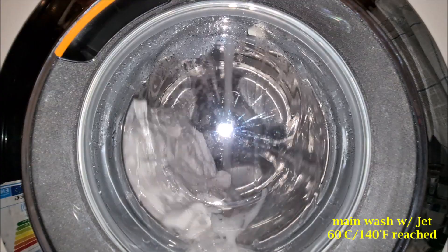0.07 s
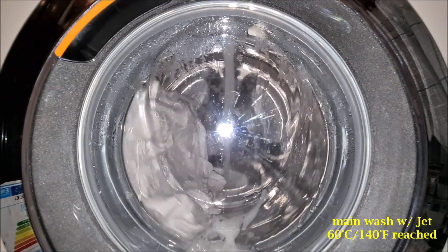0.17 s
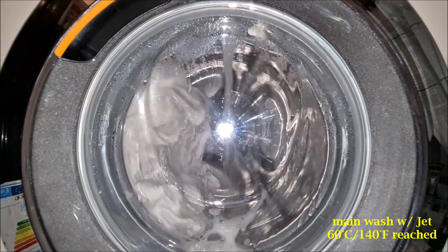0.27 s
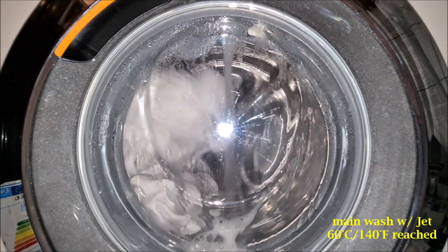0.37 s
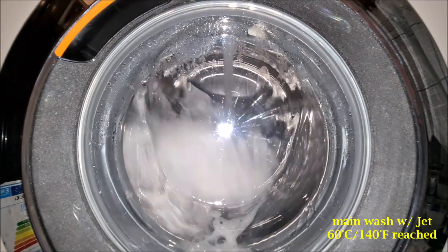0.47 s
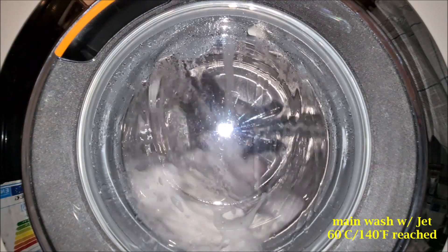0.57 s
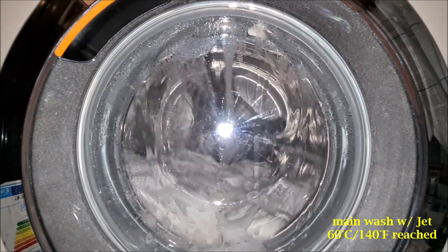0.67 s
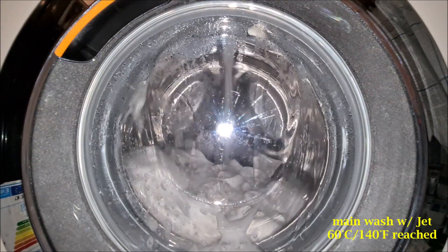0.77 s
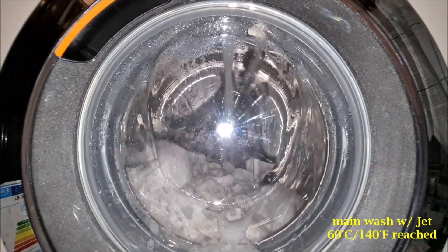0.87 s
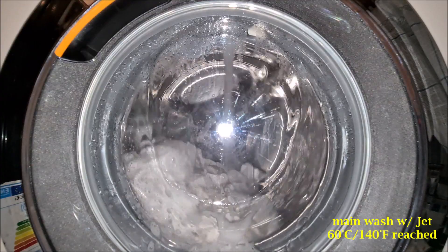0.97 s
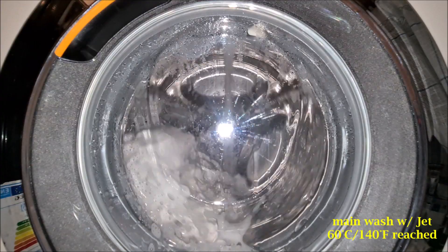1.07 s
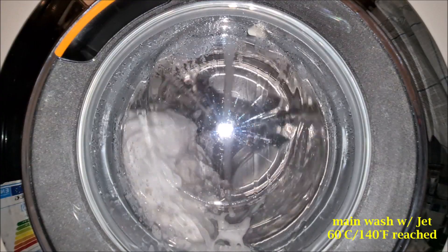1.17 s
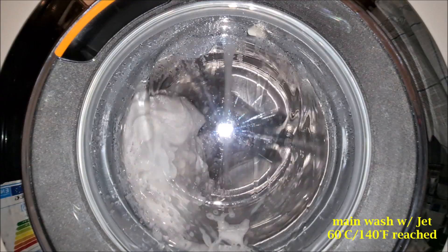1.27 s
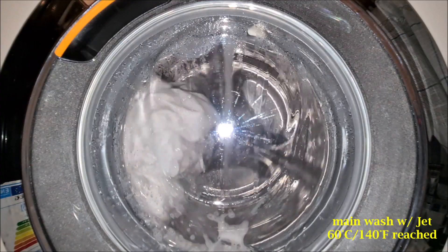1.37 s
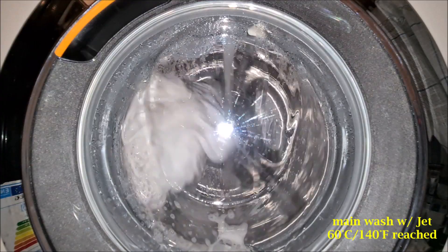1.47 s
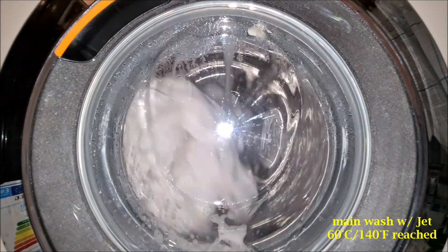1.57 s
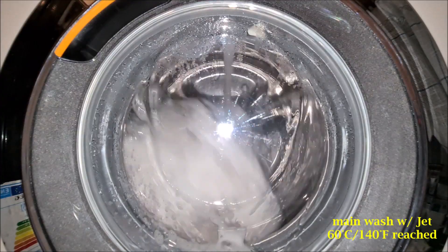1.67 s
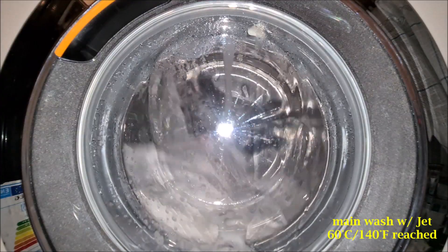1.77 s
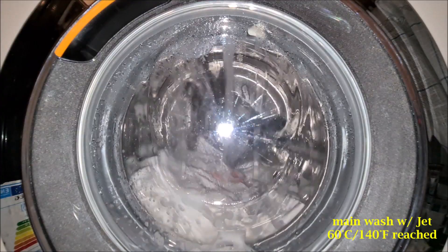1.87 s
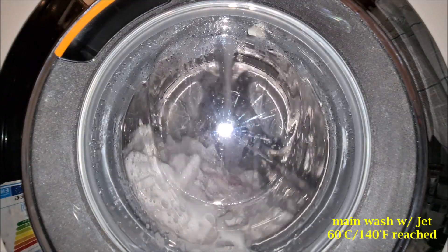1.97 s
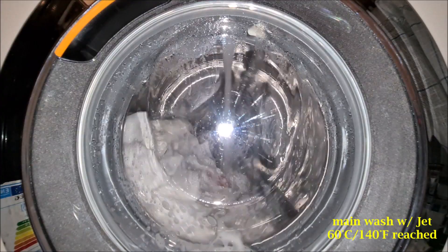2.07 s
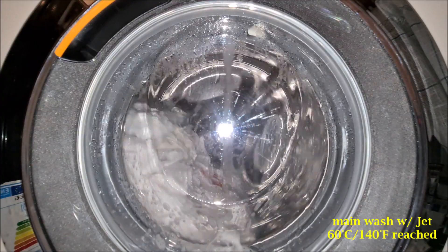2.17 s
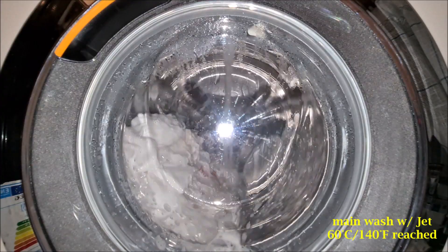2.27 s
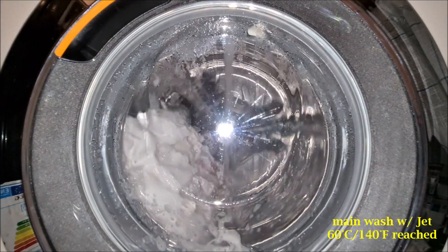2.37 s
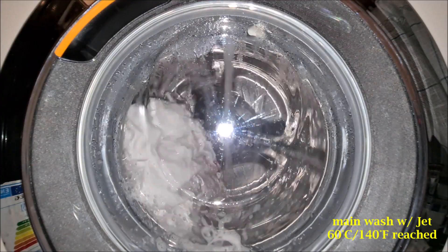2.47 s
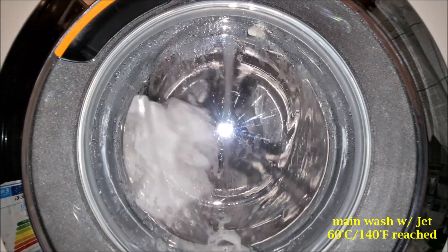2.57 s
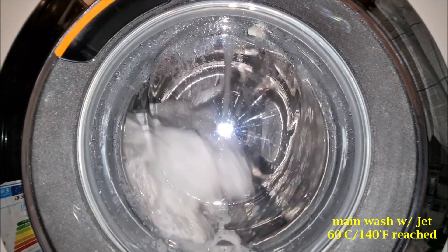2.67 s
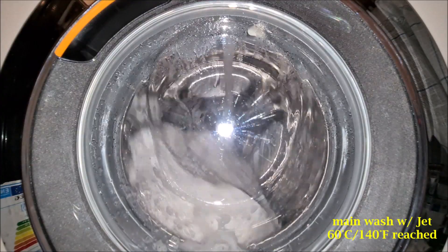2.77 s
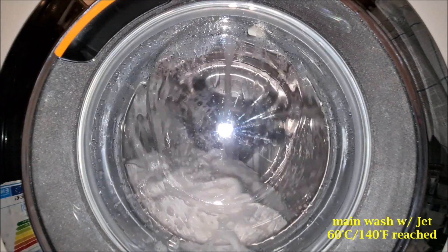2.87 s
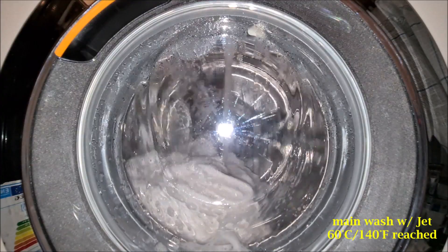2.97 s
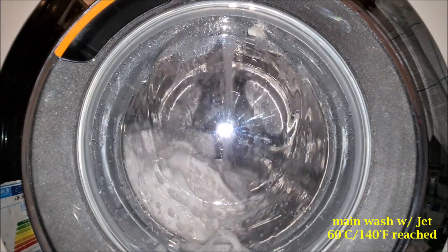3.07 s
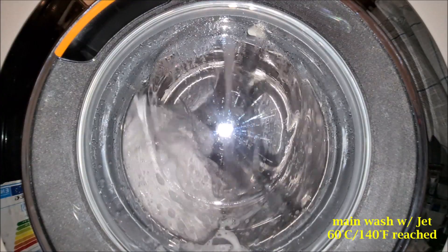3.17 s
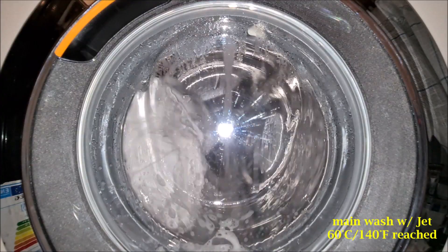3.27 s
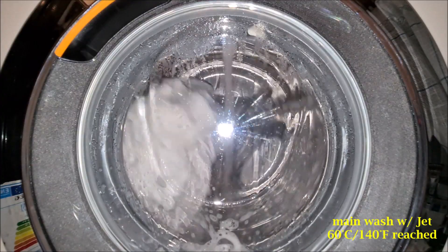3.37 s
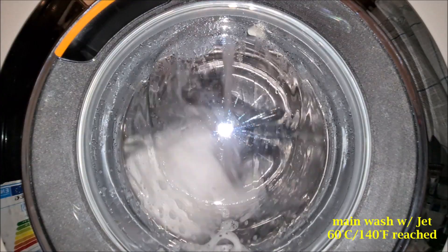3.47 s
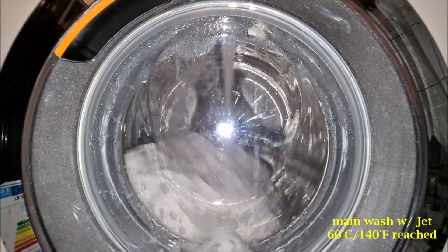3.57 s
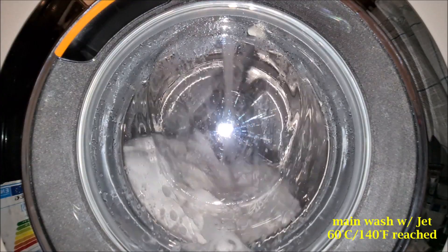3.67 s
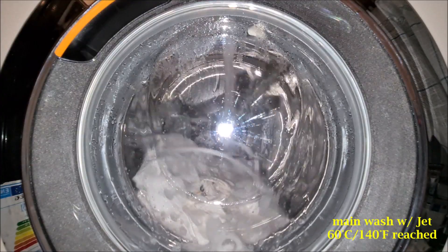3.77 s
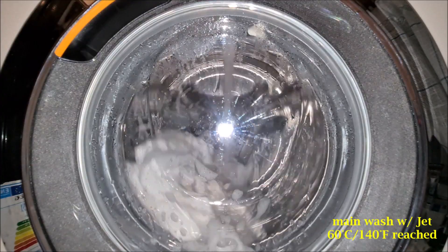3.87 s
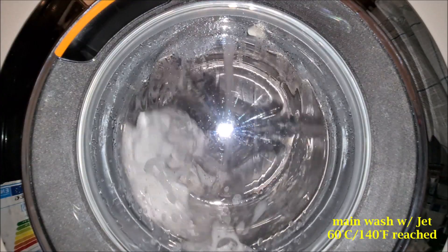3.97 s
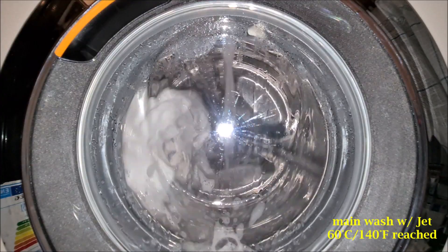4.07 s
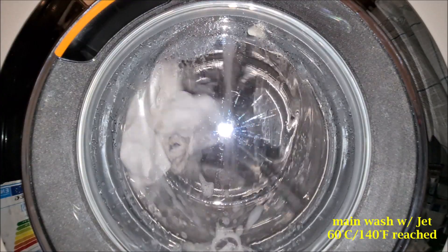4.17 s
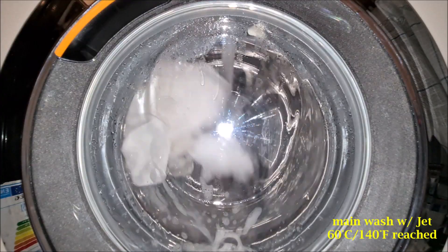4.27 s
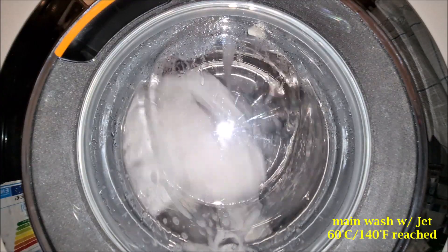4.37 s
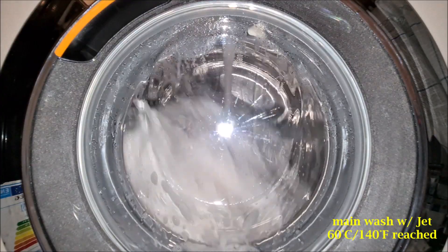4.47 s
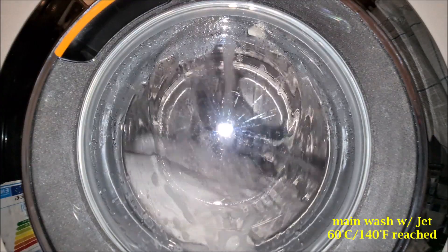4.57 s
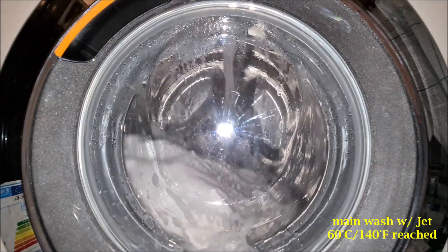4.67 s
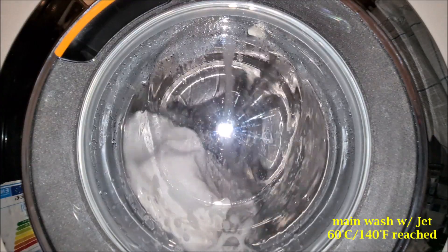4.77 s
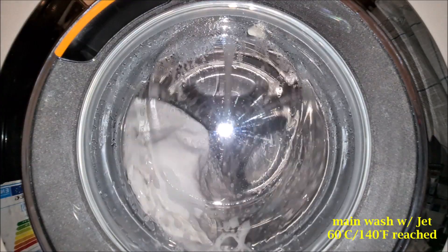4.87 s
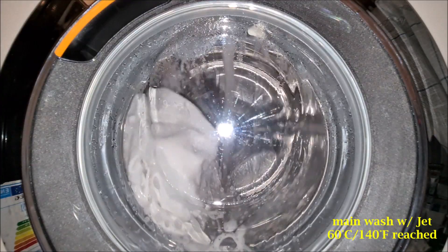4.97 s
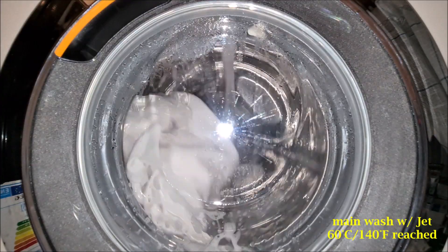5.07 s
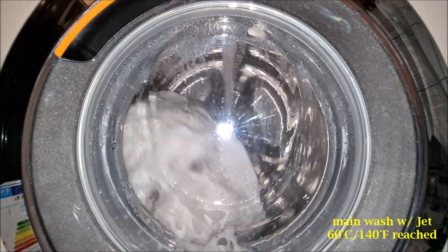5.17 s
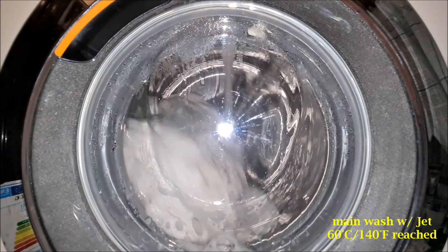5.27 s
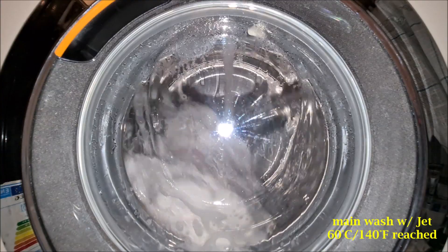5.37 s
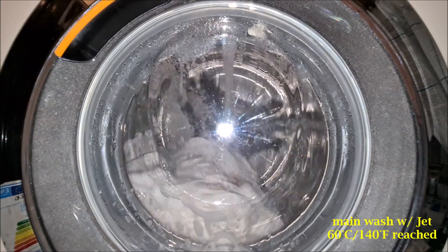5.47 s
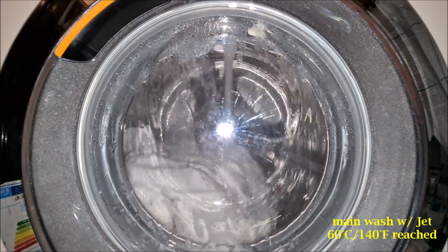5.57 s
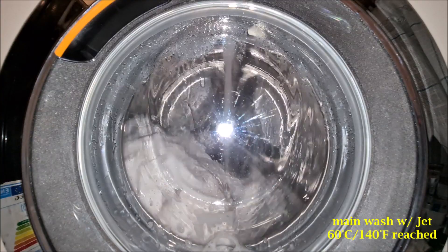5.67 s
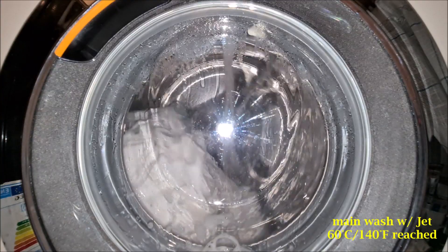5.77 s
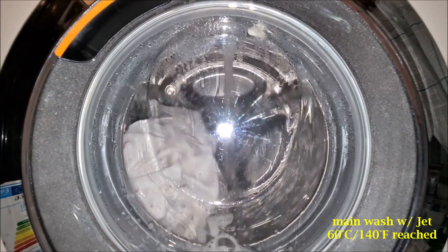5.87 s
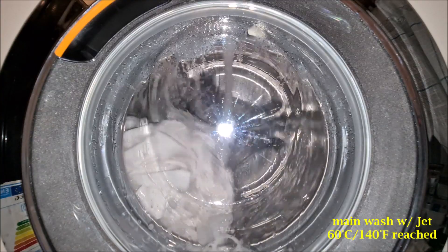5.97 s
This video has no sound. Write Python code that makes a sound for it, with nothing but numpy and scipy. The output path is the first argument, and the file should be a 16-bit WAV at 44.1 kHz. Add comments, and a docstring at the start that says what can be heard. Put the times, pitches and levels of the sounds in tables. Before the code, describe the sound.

Heard close outside the door glass of a running front-loading washer, for about six seconds. A low, slightly wavering pump and motor hum continues under soft drum rumble, muffled watery churning, faint hiss and fine pattering drops. Three quick hollow hoots of cloth rubbing the door come at 0.1-0.3, then a heavy wet flop with a deep boom at 0.6 while spray hiss rises until about 1.3. A bright double tick cracks at 1.0. Another hoot at 1.5 leads to clustered wet slaps and the strongest low thump near 1.8. Jet hiss swells again from 2.5 to 3.2, brightest and faintly singing near 2.7, around a softer, splashier flop at 2.8. Rumbling flops follow at 3.7, 4.5 with extra slaps, and 5.4, with small hoots near 3.2, 4.2 and faintly 5.7-5.9. Humming, churning and patter carry on to the end.

```python
"""Just outside the door glass of a front-loading washing machine: wet laundry tumbles about once a second.
Pump and motor hum as sine lines; the drum rumbles and churns as coloured noise.
Rising cloth rubs the door (resonant noise, wavering hoots), then flops (clouds of impacts); the tub booms.
Drops patter as random impacts smeared by the drum, a jet hisses in bursts on bare steel,
and a few short noise cracks tick against the drum, most clearly near 1 s."""
import sys
import numpy as np
from scipy import signal
from scipy.fft import rfft, irfft
from scipy.io import wavfile
from scipy.ndimage import uniform_filter1d

SR = 44100
rng = np.random.default_rng(int(sys.argv[2]) if len(sys.argv) > 2 else 0)


def transcribe(u):
    """Save the signal u as a 16-bit wav file named by the first command-line argument.

    u: samples, shape (n,) or (channels, n), limited to [-1, 1]; the rate is SR.
    q: integer samples, one column per channel.
    """
    v = np.clip(np.atleast_2d(u).T, -1, 1)
    q = np.round(v * 32767).astype(np.int16)
    wavfile.write(sys.argv[1], SR, q)


N = 266055
TIME_S = np.arange(N) / SR
BINS_HZ = np.fft.rfftfreq(N, 1 / SR)

# Levels are nominal, ahead of the microphones. Spectra set colour only: radiate() normalises them.
# Pump lines on mains multiples, motor at 130 Hz: (frequency [Hz], rms level [dB])
HUM_LINES = [(50, -54.5), (100, -54.5), (130, -61.5), (200, -55), (250, -59), (300, -63), (500, -77.5),
             (550, -83)]
# Rumble of the tub on its springs: (frequency [Hz], relative density [dB per Hz])
RUMBLE_SPECTRUM = [(22, -48), (31, -31), (42, -15), (54, -1), (76, 6.5), (92, -1), (120, -29), (200, -45),
                   (500, -41.5)]
# Load churning in water: (frequency [Hz], relative density [dB per Hz])
CHURN_SPECTRUM = [(60, -10.5), (110, -2.5), (140, 1.5), (165, 3), (183, -7), (212, 2), (245, 1),
                  (283, -3.5), (315, 1), (345, -3.5), (450, -2), (535, -12.5), (680, -14), (1300, -28.5)]
# Bunched load rolling over: (start [s], length [s], rumble level [dB], churning level [dB])
ROLLS = [(1.414, 0.11, -55, -49), (1.994, 1, -50, -50), (3.363, 0.75, -59, -51), (3.553, 0.43, -36, -49),
         (4.978, .8, -52, -50)]
# Load carried up and dropped: (landing [s], level [dB], gathering time [s], splash re level [dB],
# tub boom peak [dB], rub level on the way up [dB], lead of rub on landing [s])
TUMBLES = [(0.586, -33, 0.031, -13, -28, -46, .33), (1.799, -37.5, 0.1, -14.5, -31.5, -47.5, 0.35),
           (2.812, -39, 0.024, -7.5, -46, -44.5, 0.11), (3.659, -36.5, 0.041, -14, -40, -57.5, 0.092),
           (4.522, -34, 0.032, -13.5, -28.5, -44.5, 0.28), (5.392, -37, 0.069, -16.5, -32, -53.5, 0.19)]
# Cloth catching on the door, which hoots: (time [s], peak level [dB])
CATCHES = [(0.116, -35.5), (0.217, -37), (0.312, -37.5), (1.36, -41.5), (1.534, -34.5), (2.535, -39),
           (2.689, -41), (3.228, -41), (4.12, -48), (4.199, -41.5), (5.68, -45), (5.88, -47.5)]
# Water drops and runoff: (frequency [Hz], relative density [dB per Hz])
WATER_SPECTRUM = [(300, -19.5), (700, -0.5), (1000, 0.5), (1500, -3), (2000, -10), (3100, -16), (4400, -17),
                  (6200, -20.5), (9000, -41.5), (15000, -31.5)]
# Bare steel uncovered to the jet: (start [s], length [s], force [dB], ahead of the spray gain)
JET_BURSTS = [(0.576, 0.72, -76), (2.507, 0.66, -68.5), (2.698, 0.1, -62.5)]
# Fine spray: (frequency [Hz], relative density [dB per Hz])
SPRAY_SPECTRUM = [(400, -5), (1000, 7), (1400, -2), (2400, -2), (3500, -0.5), (4600, -4), (6200, -4),
                  (9000, -11), (15500, -17)]
# Pitches the steel sings under the full jet: (frequency [Hz], width [Hz], relative level [dB])
STEEL_PITCHES = [(3250, 250, 3.5), (4200, 220, -9), (6100, 600, -10.5)]
# Faint background hiss: (frequency [Hz], relative density [dB per Hz])
AIR_SPECTRUM = [(100, -42), (2000, 25.5), (6000, 2.5), (9000, -1), (15500, -7.5)]
# Heavy lumps bumping the tub: (time [s], peak level [dB], pitch [Hz])
THUMPS = [(0.208, -37, 59.3), (1.017, -38.5, 56), (1.773, -19.5, 65.2), (2.236, -32, 60.3), (2.31, -35, 60),
          (2.392, -33.5, 63.6), (2.886, -36.5, 65), (2.936, -36.5, 60.6), (3.336, -32, 65),
          (3.535, -40, 67), (3.872, -36, 55.6), (4.803, -36, 64), (5.472, -30.5, 76)]
# Single wet folds smacking flat: (time [s], level [dB], splash re level [dB])
SLAPS = [(1.012, -53, -6), (1.705, -35.5, -14.5), (1.756, -34, -7.5), (1.79, -38.5, -10.5),
         (1.835, -37, -17), (2.371, -48, -12), (3.09, -52.5, -2.5), (4.446, -39.5, -15), (4.553, -42.5, -4),
         (4.589, -32, -17.5), (5.09, -46.5, -8.5)]
# Dull slap of cloth: (frequency [Hz], relative density [dB per Hz])
FLOP_SPECTRUM = [(50, -7.5), (110, -1), (160, -3), (185, -5.5), (215, 3), (250, 1), (282, -5.5), (330, -4),
                 (460, -1.5), (550, -12.5), (850, -25.5), (2000, -52)]
# Wet smack: (frequency [Hz], relative density [dB per Hz])
SPLASH_SPECTRUM = [(300, -29), (500, -8), (700, 4.5), (880, -2.5), (1200, -4.5), (1700, -15), (2800, -20.5),
                   (4000, -29), (6500, -38.5), (15000, -71)]
# Hard ticks and fat drops on the drum: (time [s], level ahead of crack and ring gains [dB],
# crack dying time [s])
TICKS = [(0.996, -61, 0.0015), (1.003, -52.5, 0.0031), (1.759, -73, 0.0053), (3.607, -74, .003),
         (4.514, -71, .004), (4.833, -69, 0.0036), (4.954, -72, .002)]
# Hard contact: (frequency [Hz], relative density [dB per Hz])
TICK_SPECTRUM = [(600, -28), (1500, -16), (2500, 3), (3600, 2.5), (4150, 1.5), (4700, 4.5), (5200, -5),
                 (5600, -0.5), (7000, -4.5), (9500, -8.5), (15500, -16)]
# Resonances of tub and drum, applied to all noise layers: (frequency [Hz], width [Hz], relative lift [dB])
SHELL_RESONANCES = [(376.1, 5, 5.5), (602, 66, 5.5), (828, 57, 3), (997, 175, 3.5), (1458, 36, 6.5),
                    (1606, 30, 2.5), (1747, 50, 5), (2210, 44, 5.5), (2373, 76, 5), (2715, 30, 7),
                    (3250, 170, -1), (4000, 110, 0.5), (4940, 95, 5.5)]
# Stereo likeness, clipped to +-1 in use: (frequency [Hz], left-right correlation [1])
CORRELATION = [(60, 0.8), (180, 1.6), (280, 0.8), (400, 0.7), (550, 0.36), (1000, 0.01), (4000, 0),
               (12000, 0.1)]
# Stereo balance: (frequency [Hz], left minus right [dB])
LEFT_MINUS_RIGHT = [(60, -3.5), (150, -2), (300, -2), (500, -1), (2000, 0.7), (4500, -2.5), (8000, -0.7),
                    (15000, 0.5)]
# Microphone colour: (frequency [Hz], gain [dB])
MICROPHONE = [(6400, -1), (6900, -5), (7400, -9), (7850, -6), (8100, -2), (8600, 0.5)]

RUMBLE_DB, CHURN_DB, PATTER_DB = -53.5, -51, -66.5
LULL_DELAY_S, LULL_WIDTH_S, LULL_DB = 0.27, 0.036, -3.5
ROLL_EDGE_S = 0.063
JOLT_RE_BOOM_DB, JOLT_RISE_S, JOLT_DIE_S = -12, 0.058, 0.1
RUB_HZ, RUB_WIDTH_HZ = 395.7, 68
RUB_RISE_S, RUB_DIE_S, RUB_BASE_DB = 0.14, 0.11, -55
CATCH_S = 0.017
PUMP_PULSE_SHARE = 0.24
JET_RISE_S, JET_DIE_S = 0.062, 0.14
JET_BASE_DB, JET_FADE_DB_PER_S = -73, 0.26
TUB_HZ, BOOM_DIE_S = 65, 0.063
THUMP_RISE_S, THUMP_DIE_S = 0.013, 0.02
FLOP_HOLD_S, FLOP_DIE_S = 0.028, 0.034
SLAP_RISE_S, SLAP_DIE_S = 0.001, 0.032
SMACK_T60_S = 0.04
TICK_RING_S = 0.025
EDGE_HZ = 15730


def from_db(db):
    """Decibels to gain."""
    return 10 ** (np.asarray(db) / 20)


def unit(x):
    """Scales to rms 1."""
    return x / np.sqrt(np.mean(x ** 2) + 1e-20)


def at_bins(points):
    """Joins (frequency [Hz], value) points on a log-frequency axis."""
    hz, value = np.transpose(points)
    return np.interp(np.log(BINS_HZ + 1), np.log(hz + 1), value)


def muffled(spectrum, corner_hz):
    """Water and cloth swallow the treble above a corner."""
    return at_bins(spectrum) - 20 * np.log10(1 + (BINS_HZ / corner_hz) ** 2)


def wander(rate_hz):
    """Slow random drift of rms 1: noise under a Gaussian low-pass."""
    spectrum = rfft(rng.standard_normal(N))
    return unit(irfft(spectrum * np.exp(-(BINS_HZ / rate_hz) ** 2), N))


def noise():
    """Two unrelated white noises."""
    return rng.standard_normal((2, N))


def impacts(per_s, spread_db):
    """Random tiny blows of uneven size, reaching both sides with unrelated strength."""
    size = from_db(spread_db * np.minimum(rng.exponential(1, N), 4))
    struck = rng.random(N) < per_s / SR
    return unit(noise() * size * struck)


def held(start_s, length_s, rise_s, die_s):
    """Builds up to the start, holds for the length, then dies away."""
    t = TIME_S - start_s
    rise = (np.minimum(t, 0) / rise_s) ** 2
    fall = np.maximum(t - length_s, 0) / die_s
    return np.exp(-rise - fall)


def swell(peak_s, gather_s, die_s):
    """Builds up to one moment, then dies away."""
    return held(peak_s, 0, gather_s, die_s)


def together(gains):
    """Unrelated sounds add in power."""
    return np.sqrt(sum(gain ** 2 for gain in gains))


def radiate(drive, spectrum_db):
    """Colours a white pair and lets it out through the shell, mixing the sides by correlation."""
    a, b = rfft(drive)
    same = np.clip(at_bins(CORRELATION), -1, 1)
    mid = a * np.sqrt((1 + same) / 2)
    side = b * np.sqrt((1 - same) / 2)
    shell_db = sum(db / (1 + (2 * (BINS_HZ - hz) / width_hz) ** 2)
                   for hz, width_hz, db in SHELL_RESONANCES)
    colour = unit(from_db(spectrum_db + shell_db))
    return irfft(np.array([mid + side, mid - side]) * colour, N)


def in_drum(drive, t60_s):
    """The drum smears each blow into a short random ring, with unevenness across pitch reduced."""
    t = TIME_S[:SR // 4]
    scatter = rfft(noise()[:, :len(t)] * from_db(-60 * t / t60_s))
    softened = scatter / np.sqrt(abs(scatter) + 1e-12)  # keeps the root of the magnitude
    tail = irfft(softened)[:, :len(t) // 2]
    tail /= np.linalg.norm(tail, axis=1, keepdims=True)
    return signal.fftconvolve(drive, tail, axes=1)[:, :N]


def patchy(drive, patchy_db):
    """Random uneven patches of level across pitch and time, a few hundredths of a second long."""
    z = signal.stft(drive, nperseg=256)[2]
    patches = uniform_filter1d(rng.standard_normal(z.shape[1:]), size=4, axis=0)  # across pitch
    patches = uniform_filter1d(patches, size=7, axis=1)  # across time
    return unit(signal.istft(z * from_db(patchy_db * unit(patches)))[1][:, :N])


def hum(waver_db=1.43, sway_rad=0.31):
    """Lines of pump and motor; the shifting load makes each waver in strength and timing."""
    total = 0
    for hz, db in HUM_LINES:
        amplitude = np.sqrt(2) * from_db(db + waver_db * wander(2.7))
        phase_rad = 2 * np.pi * (hz * TIME_S + rng.random()) + sway_rad * wander(1.6)
        total = total + amplitude * np.sin(phase_rad)
    return total


def drum(lumpy_db=2.1, heave_db=-1.0):
    """The tub rumbles on its springs as the load churns: more in rolls; steady churning lulls after falls."""
    rolls = [(held(s, length_s, ROLL_EDGE_S, ROLL_EDGE_S), rumble_db, churn_db)
             for s, length_s, rumble_db, churn_db in ROLLS]
    # each boom also sets the cabinet rumbling
    jolts = [from_db(boom_db + JOLT_RE_BOOM_DB) * swell(s, JOLT_RISE_S, JOLT_DIE_S)
             for s, _, _, _, boom_db, *_ in TUMBLES]
    steady_shake = from_db(RUMBLE_DB + heave_db * wander(4.4))
    shake = together([steady_shake] + jolts + [from_db(db) * roll for roll, db, _ in rolls])
    # the fallen load lies still for a moment
    lull = sum(np.exp(-((TIME_S - s - LULL_DELAY_S) / LULL_WIDTH_S) ** 2) for s, *_ in TUMBLES)
    steady_stir = from_db(CHURN_DB + LULL_DB * lull)
    stir = together([steady_stir] + [from_db(db) * roll for roll, _, db in rolls])
    rumble = shake * radiate(noise(), muffled(RUMBLE_SPECTRUM, corner_hz=704))
    lumps = unit(from_db(lumpy_db * wander(5.5)))
    churn = stir * lumps * radiate(noise(), muffled(CHURN_SPECTRUM, corner_hz=1710))
    return rumble + churn


def rubbing(waver_share=0.0428):
    """Rising wet cloth slides on the door and stirs a hollow resonance, which hoots when it catches."""
    resonance_db = -20 * np.log10(1 + ((BINS_HZ - RUB_HZ) / RUB_WIDTH_HZ) ** 2)
    lifts = [from_db(rub_db) * swell(s - lead_s, RUB_RISE_S, RUB_DIE_S)
             for s, *_, rub_db, lead_s in TUMBLES]
    slide = together([from_db(RUB_BASE_DB)] + lifts) * radiate(noise(), resonance_db)
    grip = sum(from_db(db) * swell(s, CATCH_S, CATCH_S) for s, db in CATCHES)
    turns = np.cumsum(RUB_HZ * (1 + waver_share * wander(41.3))) / SR
    return slide + grip * np.sin(2 * np.pi * turns)


def jet_force():
    """How hard the jet strikes bare steel: a slowly weakening base plus bursts."""
    bursts = [from_db(db) * held(s, length_s, JET_RISE_S, JET_DIE_S) for s, length_s, db in JET_BURSTS]
    return together([from_db(JET_BASE_DB - JET_FADE_DB_PER_S * TIME_S)] + bursts)


def water(drop_share=0.66, surge_db=-0.5, runoff_db=1, runoff_delay_s=0.11):
    """Drops patter, pulsing with each turn of the pump; jet water runs off a moment after it strikes."""
    pump_hz = HUM_LINES[0][0]
    pulse = 1 + PUMP_PULSE_SHARE * (2 * np.cos(np.pi * pump_hz * TIME_S) ** 4 - 1)
    drops = patchy(in_drum(pulse * impacts(per_s=700, spread_db=0.5), t60_s=0.087), patchy_db=-0.5)
    stream = unit(pulse * noise())
    flow = np.sqrt(drop_share) * drops + np.sqrt(1 - drop_share) * stream
    flow = flow * from_db(surge_db * wander(14.0))
    runoff = from_db(runoff_db) * np.interp(TIME_S - runoff_delay_s, TIME_S, jet_force())
    return together([from_db(PATTER_DB), runoff]) * radiate(flow, at_bins(WATER_SPECTRUM))


def jet(spray_gain_db=4.0, flutter_db=-0.6, sing_db=-64):
    """A fine spray hisses on steel left bare by the laundry; head-on it makes the steel sing."""
    spray = patchy(impacts(per_s=20000, spread_db=-0.5), patchy_db=1.5)
    spray = spray * from_db(flutter_db * wander(25))
    force = jet_force()
    hiss = from_db(spray_gain_db) * force * radiate(spray, at_bins(SPRAY_SPECTRUM))
    steel = sum(from_db(db) / (1 + ((BINS_HZ - hz) / width_hz) ** 2)
                for hz, width_hz, db in STEEL_PITCHES)
    song = radiate(noise(), 20 * np.log10(steel))
    return hiss + from_db(sing_db) * (force / force.max()) ** 3 * song


def air(air_db=-78):
    """A faint even hiss of coloured noise."""
    return from_db(air_db) * radiate(noise(), at_bins(AIR_SPECTRUM))


def swing(peak_s, db, hz, gather_s, die_s):
    """The tub swings on its springs for a few slow cycles."""
    return from_db(db) * swell(peak_s, gather_s, die_s) * np.cos(2 * np.pi * hz * (TIME_S - peak_s))


def thumps():
    """Each fall of the load booms in the tub; single lumps bump it more briefly."""
    booms = sum(swing(s, boom_db, TUB_HZ, gather_s, BOOM_DIE_S)
                for s, _, gather_s, _, boom_db, *_ in TUMBLES)
    bumps = sum(swing(s, db, hz, THUMP_RISE_S, THUMP_DIE_S) for s, db, hz in THUMPS)
    return booms + bumps


def flops():
    """Cloth lands fold by fold: a cloud of dull slaps, with wetter smacks on top."""
    landings = [(from_db(db) * held(s, FLOP_HOLD_S, gather_s, FLOP_DIE_S), splash_db)
                for s, db, gather_s, splash_db, *_ in TUMBLES]
    landings += [(from_db(db) * swell(s, SLAP_RISE_S, SLAP_DIE_S), splash_db)
                 for s, db, splash_db in SLAPS]
    weight = together(force for force, _ in landings)
    wetness = together(force * from_db(splash_db) for force, splash_db in landings)
    blows = weight * impacts(per_s=3000, spread_db=1.13)
    slaps = radiate(blows, muffled(FLOP_SPECTRUM, corner_hz=2250))
    smacks = wetness * patchy(impacts(per_s=4500, spread_db=1.6), patchy_db=1.0)
    return slaps + radiate(in_drum(smacks, SMACK_T60_S), at_bins(SPLASH_SPECTRUM))


def ticks(crack_gain_db=4, ring_gain_db=-3):
    """Sharp contacts crack brightly, then leave a short duller ring in the drum."""
    crack = sum(from_db(db) * swell(s, 0.0011, die_s) for s, db, die_s in TICKS)
    ring = sum(from_db(db) * swell(s, 0.0033, TICK_RING_S) for s, db, _ in TICKS)
    bright = radiate(crack * noise(), at_bins(TICK_SPECTRUM))
    dull = radiate(ring * noise(), muffled(TICK_SPECTRUM, corner_hz=7000))
    return from_db(crack_gain_db) * bright + from_db(ring_gain_db) * dull


def scene():
    """The whole machine over a faint even hiss."""
    return hum() + drum() + rubbing() + water() + jet() + air() + thumps() + flops() + ticks()


def record(dry):
    """Two slightly unequal microphones with a dip in the treble, then the band limit."""
    colour_db = at_bins(MICROPHONE) + np.array([[0.5], [-0.5]]) * at_bins(LEFT_MINUS_RIGHT)
    low_pass = np.clip((EDGE_HZ - BINS_HZ) / 100 + 0.5, 0, 1)
    return irfft(rfft(dry) * from_db(colour_db) * low_pass, N)


dry = scene()
out = record(dry)
transcribe(out)
```